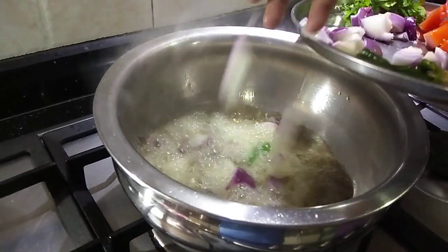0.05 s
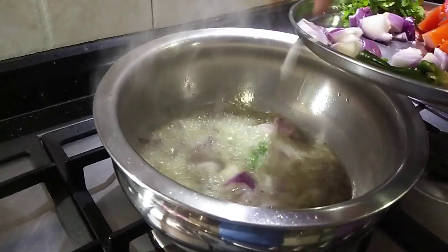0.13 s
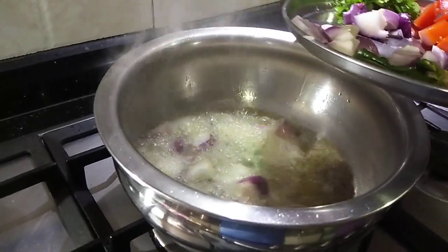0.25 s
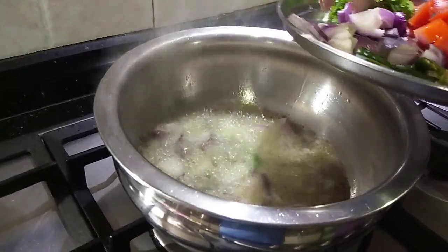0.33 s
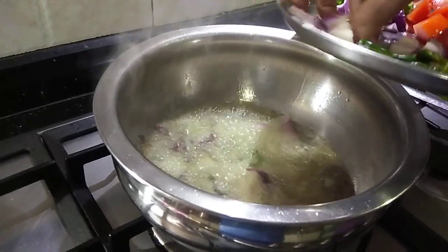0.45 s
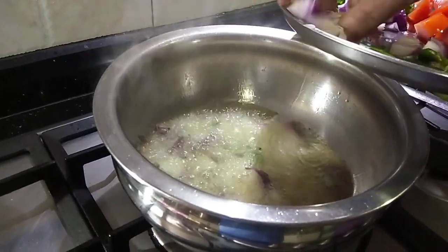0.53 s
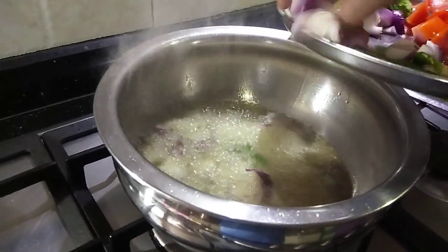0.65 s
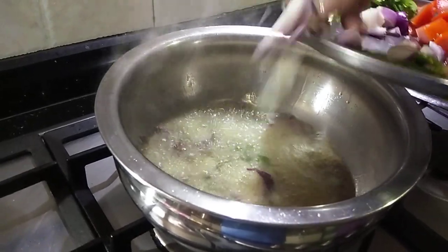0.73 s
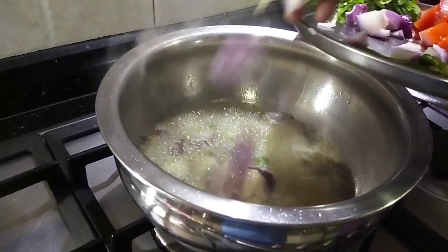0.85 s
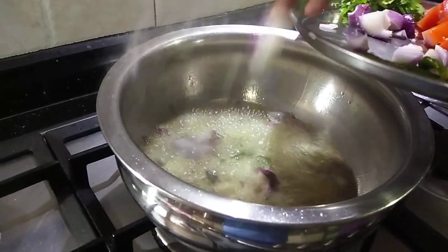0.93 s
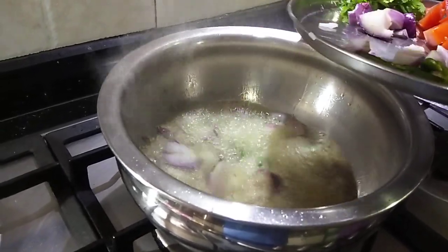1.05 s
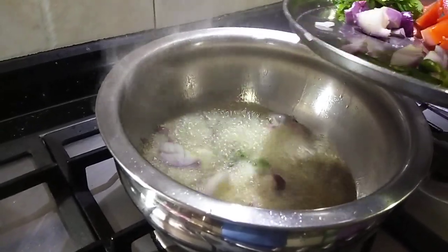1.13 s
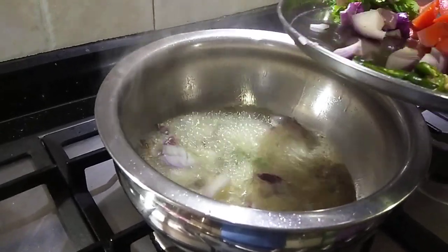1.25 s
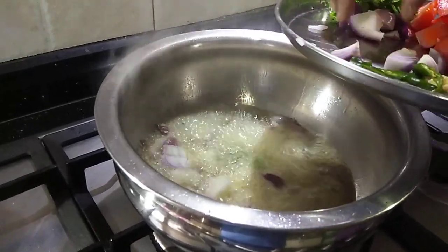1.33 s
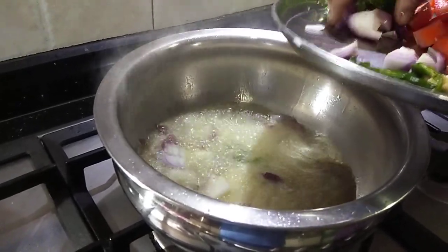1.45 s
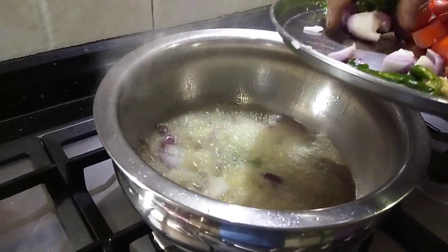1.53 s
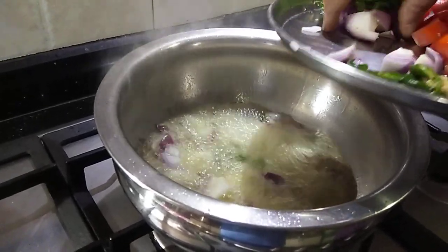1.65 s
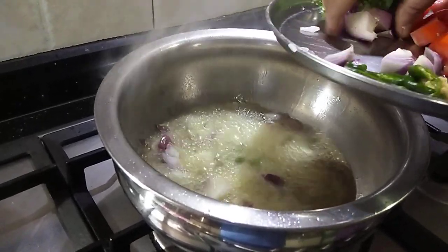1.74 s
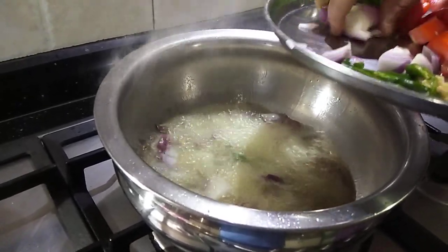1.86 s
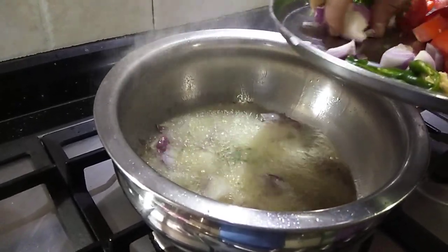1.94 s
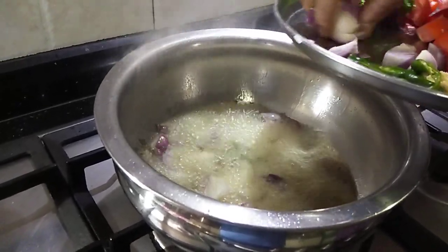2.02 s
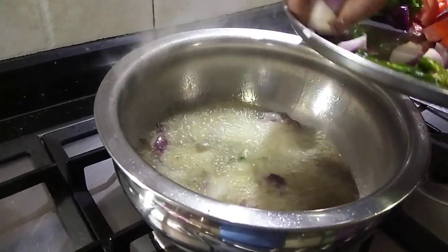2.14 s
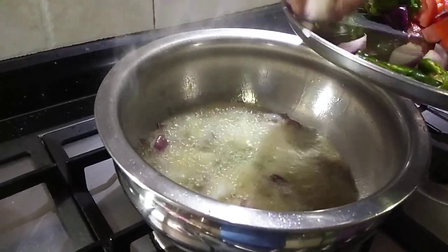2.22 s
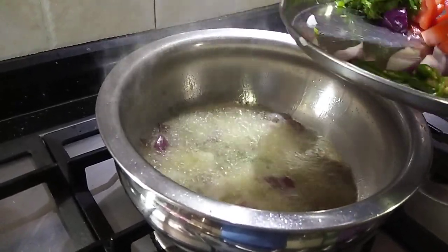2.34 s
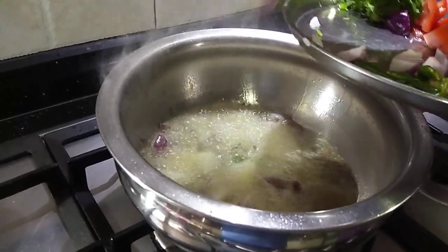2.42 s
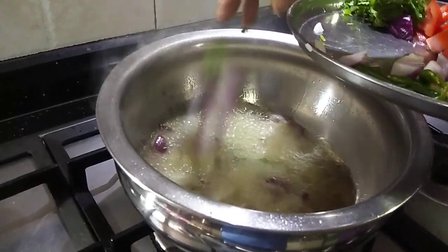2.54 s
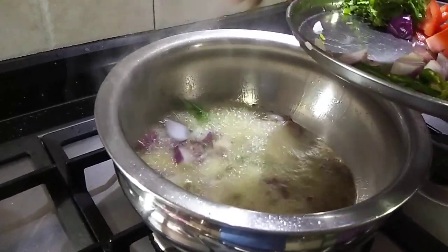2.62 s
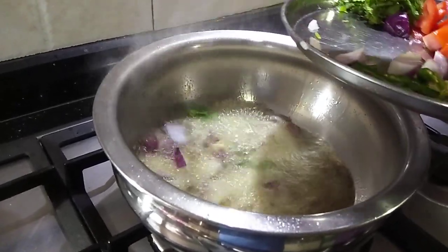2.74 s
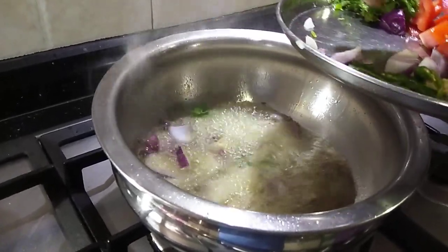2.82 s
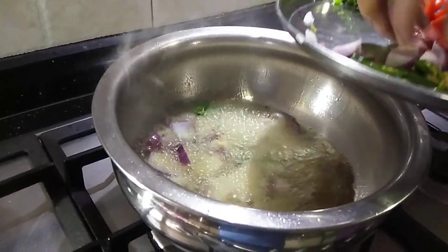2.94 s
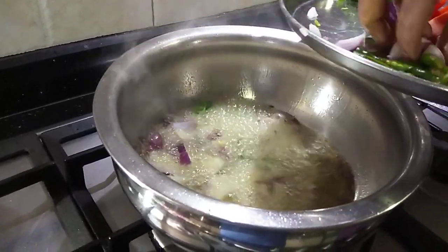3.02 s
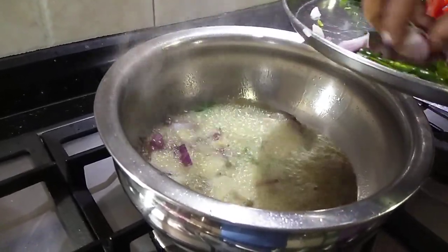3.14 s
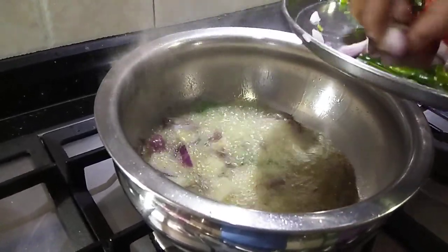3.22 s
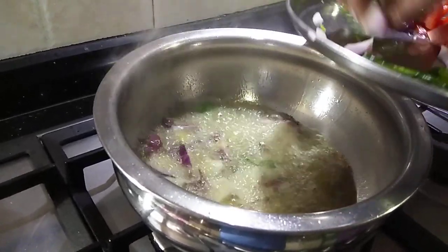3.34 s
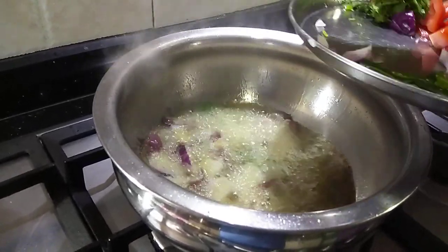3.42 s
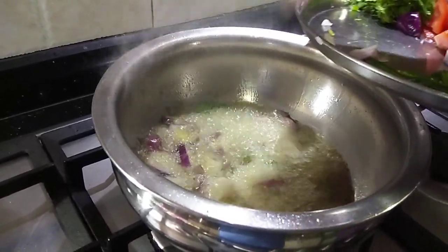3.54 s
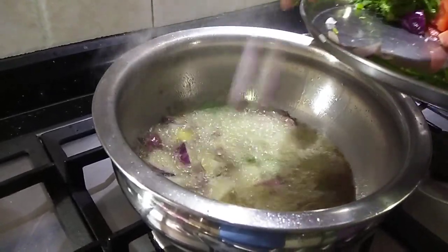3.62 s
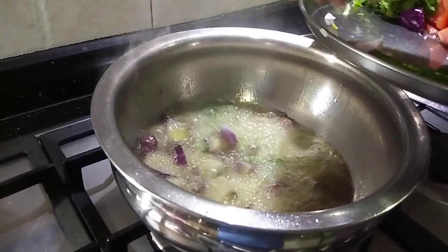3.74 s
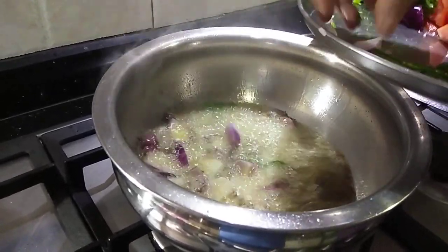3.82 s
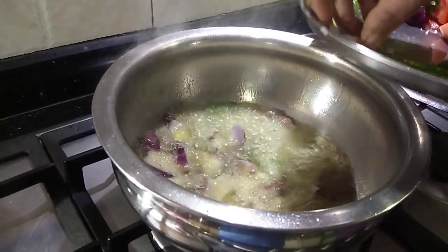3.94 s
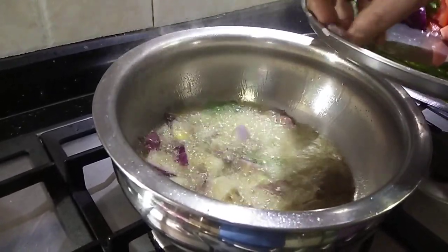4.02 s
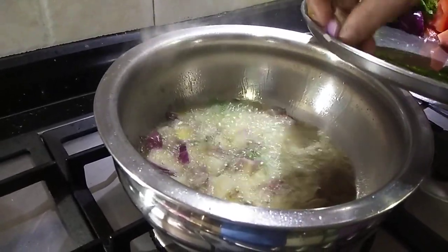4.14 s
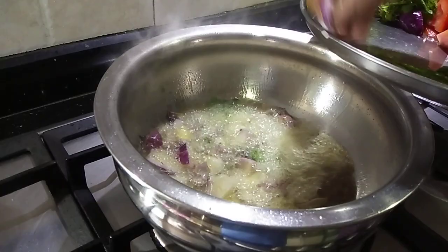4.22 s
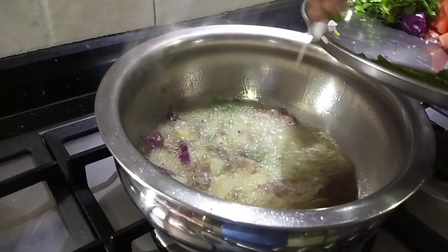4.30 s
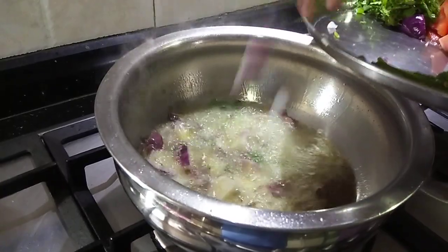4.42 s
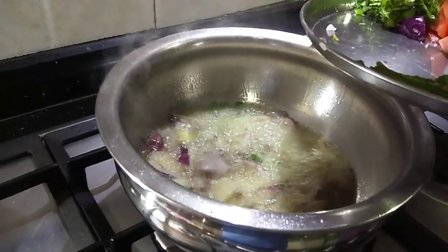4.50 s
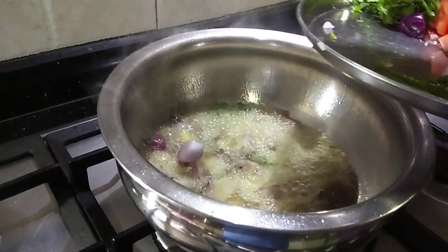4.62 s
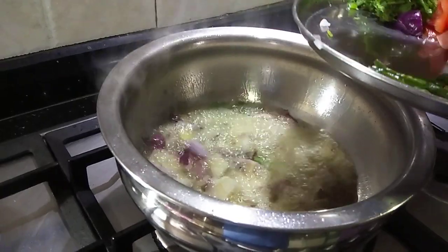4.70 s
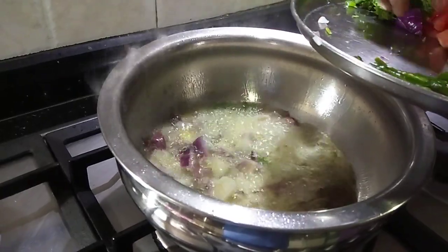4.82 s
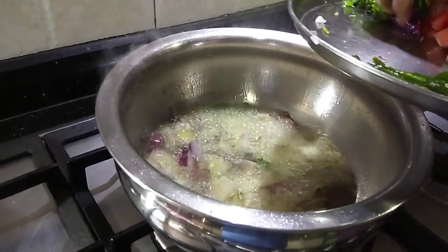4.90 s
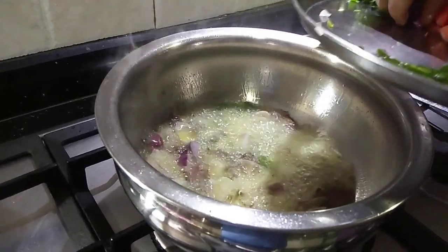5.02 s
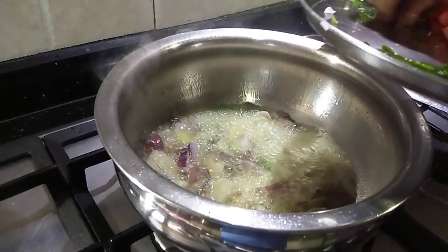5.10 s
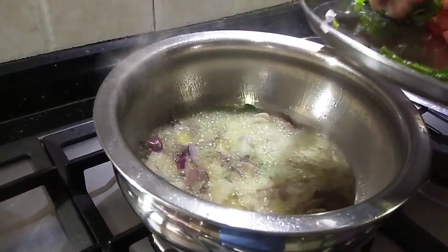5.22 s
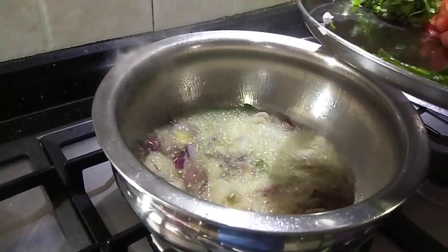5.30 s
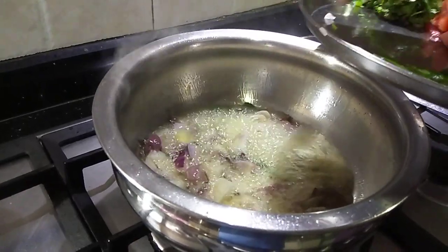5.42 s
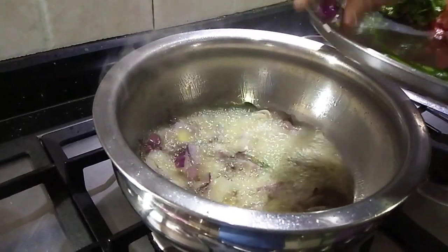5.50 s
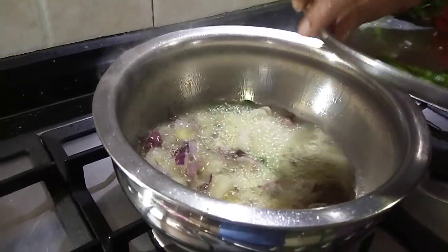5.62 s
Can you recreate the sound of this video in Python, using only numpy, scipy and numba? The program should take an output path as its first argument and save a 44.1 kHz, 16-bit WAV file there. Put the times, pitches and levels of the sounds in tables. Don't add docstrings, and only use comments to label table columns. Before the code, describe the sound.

Close, lively sizzle of wet vegetables in deep hot oil, with snapping crackles, steam spits, a deeper boil and soft pot thuds.

```python
import sys
import numpy as np
from scipy import signal
from scipy.fft import rfft, irfft, next_fast_len
from scipy.io import wavfile
from scipy.ndimage import uniform_filter1d, map_coordinates
from numba import njit

SR = 44100
rng = np.random.default_rng(int(sys.argv[2]) if len(sys.argv) > 2 else 0)


def voltage_ratio(decibels):
    exponent = np.asarray(decibels, float) / 20
    return 10 ** exponent


def log_audio(samples):
    frames = np.atleast_2d(samples).T
    limited = np.clip(frames, -1, 1)
    pcm = np.round(limited * 32767).astype(np.int16)
    wavfile.write(sys.argv[1], SR, pcm)


N = 249606
TIME = np.arange(N) / SR
PADDED = next_fast_len(N + 4096, True)
HZ = np.maximum(np.arange(PADDED // 2 + 1) * SR / PADDED, 1)
FIZZ_PAN_DB = -0.5


def through(x, response):
    return irfft(rfft(x, PADDED) * response, PADDED)[..., :N]


def colour(x, points):
    hz, db = np.transpose(points)
    y = through(x, voltage_ratio(np.interp(np.log(HZ), np.log(hz), db, -90, -90)))
    return y / np.sqrt(np.mean(y ** 2))


def walk(rate):
    hold = int(SR / rate)
    held = np.repeat(rng.standard_normal(N // hold + 1), hold)
    return 1.3 * uniform_filter1d(uniform_filter1d(held, hold), hold)[:N]


def step(s, takes_s):
    return np.clip((TIME - s) / takes_s + .5, 0, 1)


def bumps(s, length_ms, db, rise=1.0):
    coarse = TIME[::64]
    u = (coarse[:, None] - s) / (length_ms / 2350)
    bells = np.exp(-.5 * np.where(u < 0, u / rise, u) ** 2)
    return np.interp(TIME, coarse, (voltage_ratio(2 * db) * bells).sum(axis=1))


@njit
def ring(start, hz, cycles, size, glide):
    out = np.zeros(N)
    for k in range(len(start)):
        first = int(start[k]) + 1
        tau = cycles[k] * SR / hz[k] / 5
        for i in range(max(first, 0), min(N, first + int(8 * tau))):
            u = (i - start[k]) / tau
            swell = u * np.exp(1 - u)
            out[i] += size[k] * swell * np.sin(2 * np.pi * cycles[k] / 5 * u * (1 + glide * u / 8))
    return out


def bubbles(s, hz, cycles, db, pan_db, spread, glide=0.072):
    lag = 3.44 + spread * rng.standard_normal(len(s))
    one = np.ones(len(s))
    ports = []
    for side in (1, -1):
        size = voltage_ratio(db + side * pan_db / 2) * one
        ports.append(ring(s * SR + side * lag / 2, hz * one, cycles * one, size, glide))
    return np.array(ports)


# t/s, lean towards the small ones/dB per octave
SIZE_MIX = [(0, 2), (0.5, 9), (0.7, 4.5), (1.1, 5), (1.5, 6.9), (1.9, 3), (2.15, 7.5), (2.4, 13), (2.5, 1),
            (3, 1.5), (3.6, 2), (4.2, -0.5), (4.7, -3), (5.1, 2.6), (5.66, 6)]


def carpet(points, cycles, scatter_db, spread, patchy_db, lean, count, size):
    moment, pitch, strength, place = np.repeat(rng.random((count, 4)), size, axis=0).T
    z = rng.standard_normal((count * size, 4)).T
    lowest, highest = points[0][0], points[-1][0]
    hz = lowest * (highest / lowest) ** pitch * np.exp(.5 / cycles * z[0])
    s = moment * N / SR - .008 + .011 * np.abs(z[2])
    where = [28 * s + 1, 2.55 * np.log2(hz / 200)]
    patches = map_coordinates(rng.standard_normal((400, 40)), where, order=1, mode="mirror")
    octaves = np.log2(np.clip(hz, 2100, 4500) / 4200)
    lean_db = lean * np.interp(s, *np.transpose(SIZE_MIX)) * octaves
    db = -scatter_db * np.log(strength) + 2.53 * z[1] + 10 * np.log10(hz) + patchy_db * patches + lean_db
    rain = bubbles(s, hz, cycles * np.exp(0.37 * z[3]), db, 4.9 * (place - .5), spread)
    return colour(rain, points)


# t/s, vigour level/dB, wetness of the pieces as steam over fizz/dB
VIGOUR = [(0.0, -23.5, 2), (0.3, -23.5, -3.5), (0.6, -26.5, -4.5), (0.89, -26, -6), (1.19, -24, -6.5),
          (1.49, -29.5, -6.5), (1.79, -29.5, -7), (2.09, -33, -4.5), (2.38, -30.5, -9), (2.68, -28, -1.5),
          (2.98, -31, 4), (3.4, -24, 3.5), (3.87, -30, 4.5), (4.17, -25.5, -2.5), (4.47, -29.5, 3),
          (4.9, -34, 0.5), (5.36, -37.5, 2.5), (5.66, -39.5, 1)]


def control(column):
    table = np.array(VIGOUR)
    return np.interp(TIME, table[:, 0], table[:, column])


# f/Hz, level/dB per Hz
KITCHEN_COLOUR = [(15, -52), (25, -21.5), (105, -0.5), (193, -4), (290, 0.5), (383, -3), (458, -7),
                  (520, -14), (680, 3.5), (1140, -120)]


def kitchen():
    mid, side = (colour(rng.standard_normal(N), KITCHEN_COLOUR) * voltage_ratio(2.8 * walk(18)) for _ in range(2))
    stir_db = 0.31 * (control(column=1) + 29)
    return voltage_ratio(-53.5 + stir_db) * (mid + 0.33 * side * np.array([[1], [-1]]))


# t/s, level/dB
ROCKS = [(0.082, -43), (0.238, -41), (0.547, -42), (0.593, -52), (0.945, -40), (1.032, -45), (1.139, -37.5),
         (1.234, -42), (1.357, -56), (1.498, -45), (1.65, -44), (1.734, -39), (1.869, -43), (2.021, -42.5),
         (2.1, -36.5), (2.19, -40), (2.429, -44), (2.594, -34), (2.736, -40), (2.91, -37), (3.245, -42),
         (3.69, -52), (4.373, -46), (5.084, -51)]


def thuds():
    thud_ms, tremble_db, from_s, until_s = 41.4, -57.5, 1, 3.0
    s, db = np.transpose(ROCKS)
    z = rng.standard_normal((len(s), 2)).T
    hz = 113 * np.exp(0.04 * walk(30))
    hum = np.sin(2 * np.pi * np.cumsum(hz) / SR) * voltage_ratio(2.5 * walk(60))
    starts = step(from_s, .1)
    tremble = starts * (1 - step(until_s, 0.25)) * voltage_ratio(2 * (tremble_db + 3.0 * walk(24.46)))
    low = hum * np.sqrt(tremble + bumps(s, 0.49 * thud_ms, db - 2.5))
    rattle_level = voltage_ratio(tremble_db + 1.0) * starts * (1 - step(until_s + 0.47, 0.34))
    rattle = carpet([(130, 2), (190, 1), (330, -6)], 9.3, 1.6, 3.0, 0, 0, count=260, size=1)
    partial_hz = 230 * np.exp(0.365 * z[0])
    partial_db = db - 6.5 + 2.2 * z[1]
    partial = bubbles(s - thud_ms / 3000, partial_hz, 13.5, partial_db, -0.94, 5.0, glide=-0.17)
    return low + rattle_level * rattle + partial


# t/s, peak level/dB, f/Hz
LANDINGS = [
    (0.12, -36, 300),
    (2.58, -31, 290),
    (2.888, -30, 288),
    (3.279, -38, 300),
    (3.689, -32.5, 316),
    (4.55, -34.5, 310),
    (4.87, -35.5, 328),
]


def splats():
    s, db, hz = np.transpose(LANDINGS)
    return bubbles(s, hz, 5.0, db, 0, 1.5)


# t/s, peak level/dB, width/ms
OIL_DROP = (5.082, -1.3, 0.064)


def oil_drop():
    s, db, width_ms = OIL_DROP
    push = -voltage_ratio(db) * np.exp(-.5 * ((TIME - s) / width_ms * 1000) ** 2)
    left = signal.lfilter(*signal.butter(1, 70, "high", fs=SR), push)
    return left * np.array([[1], [0]])


# f/Hz, width/Hz, level/dB
POT_MODES = [(613, 206, 9.5), (693, 25, -10.5), (768, 173, 7.5), (1247, 184, 4.5), (889, 217, -10),
             (1137, 180, -4.5), (1390, 75, 1), (1974, 157, 8.5), (2690, 130, 5.5), (4200, 50, 2.5),
             (4650, 41, -1.5)]


def pot(x):
    cut_hz, t60_s, tail_db = 484, 0.056, -4
    modes = 1
    for f, width, db in POT_MODES:
        spring = f ** 2 - HZ ** 2
        loss = 1j * HZ * width
        modes = modes * (spring + loss * voltage_ratio(db / 2)) / (spring + loss / voltage_ratio(db / 2))
    cut = signal.freqs(*signal.butter(5, cut_hz, "high", analog=True), HZ)[1]
    noise = rng.standard_normal((2, 4096))
    shared = signal.sosfilt(signal.butter(2, 1600, fs=SR, output="sos"), noise[0] - noise)
    tail = (noise + shared) * np.exp(-np.log(1000) * TIME[:4096] / t60_s)
    tail = voltage_ratio(tail_db) * tail / np.sqrt((tail ** 2).sum(axis=1, keepdims=True))
    return through(x, modes * cut * (1 + rfft(tail, PADDED)))


# f/Hz, level/dB per Hz
FOAM_COLOUR = [(1050, -14), (1250, -4), (1600, -6), (1950, -9.5)]
# f/Hz, level/dB per Hz
BLIP_COLOUR = [(1900, -7.5), (2800, -4), (4200, 8), (6500, -4)]


def froth():
    builds, sinks = step(3.36, 1.7), step(4.74, 0.49)
    foam = builds * (1 - sinks) * voltage_ratio(-33 + 0.65 * walk(30))
    blips = voltage_ratio(control(column=1) - 7)
    return (foam * carpet(FOAM_COLOUR, 7.0, 1.5, 3.0, 1.0, 0, count=2500, size=2)
            + blips * carpet(BLIP_COLOUR, 18.6, 2.7, 4.7, 0.83, 1.5, count=500, size=3))


# t/s, peak level/dB, f/Hz, left
# minus right/dB
TICKS = [(0.1216, -15, 5230, -4), (0.197, -8, 5270, -0.5), (0.2144, -12, 4330, 0.0),
         (0.2846, -6, 3220, 0.5), (0.347, -9, 4620, -4), (0.595, -18, 4020, -1.5),
         (0.6285, -8.5, 2230, 1), (0.6827, -5, 4630, -5), (0.7292, -16, 4910, -1.5),
         (0.7771, -1.5, 4300, -1.5), (0.8579, -24, 4300, 0.5), (0.9597, -16, 3730, -1.5),
         (0.9792, -16, 5400, 0), (1.0124, -9, 4190, -6), (1.035, -5.5, 3420, 4),
         (1.0705, -4, 3800, 0), (1.1755, -5, 4450, -5), (1.2357, -11, 2700, 0),
         (1.297, -12.5, 1970, 3), (1.3356, -12.5, 2130, 1), (1.3957, -8, 3440, 0.5),
         (1.4433, -5, 4900, -10), (1.513, -14.5, 2000, -1.0), (1.5932, -10, 3830, -8),
         (1.623, -6, 4630, -2.5), (1.6581, -13, 3500, -4), (1.705, -6.5, 2490, -4),
         (1.7363, -6.5, 4370, -6), (1.753, -4, 4220, 0), (1.8138, -11, 3400, -1),
         (1.9155, -12, 4250, 6), (1.9854, -18, 2780, -9), (2.09, -7, 5030, -8), (2.112, -16, 4100, 0),
         (2.142, -12.5, 4100, -5), (2.208, -20, 4360, -2.5), (2.242, -19, 4760, -1.5),
         (2.3015, -9, 3890, 3), (2.3387, -13, 4790, -1.5), (2.393, -12, 5100, 0.5),
         (2.4478, -7.5, 3430, 3), (2.5043, -4.5, 4330, -7), (2.5513, -21, 2780, -7),
         (2.6424, -14.5, 2060, -8), (2.7013, -11, 2570, -5), (2.7372, -11.5, 3900, -1),
                  (2.7801, -10, 3350, -3), (2.9228, -13, 4370, -1.0), (3.164, -12, 2570, -4),
                  (3.1914, -16, 2820, -4), (3.222, -14, 2870, 0), (3.3303, -18, 2690, -6),
                  (3.378, -11, 4280, -9), (3.4371, -16.5, 2690, -5), (3.4575, -16, 1980, -4),
                  (3.592, -12.5, 3630, -2.5), (3.7479, -12.5, 3250, -1.5), (3.7804, -14, 4100, -5),
                  (3.7948, -11.5, 2720, -9), (3.905, -18, 2820, -6), (3.964, -13, 2700, -9),
                  (4.048, -7.5, 3560, -3), (4.0831, -22, 1950, -8), (4.1789, -13, 4300, -5),
                  (4.3226, -22, 1970, -1.5), (4.6883, -21.5, 2620, -4), (4.7157, -12.5, 2920, -3.5),
                  (4.8714, -12.5, 3360, -1), (4.9402, -15, 2300, -9), (4.9646, -16, 5600, 1),
                  (5.0145, -19.5, 2060, -2), (5.0967, -15.5, 4200, -16), (5.104, -18, 2690, -11),
                  (5.1803, -30, 2540, -9), (5.1911, -14, 2840, -9), (5.2272, -20, 2500, -10),
                  (5.2565, -13, 4570, -13), (5.302, -17.5, 3380, -14), (5.5348, -12.5, 3580, -7),
                  (5.626, -20, 3500, -4.5)]


def ticks(count=3):
    s, db, hz, pan_db = np.transpose(TICKS)
    first = bubbles(s, hz, 11.4, db - 6.5, 1.5 * pan_db, 1.83)
    s, db, hz, pan_db = np.repeat([s, db, hz, pan_db], count, axis=1)
    u = rng.random((len(s), 2)).T
    late = 0.001208 - 0.0027 * np.log(u[0])
    return first + bubbles(s + late, hz * np.exp(0.25 * (u[1] - .5)), 11.0, db - 7.0, 0.8 * pan_db, 3.1)


# t/s, peak level/dB, f/Hz
MIDDLE_POPS = [(0.376, -18.5, 1370), (0.492, -14, 1520), (1.013, -10.5, 1190), (1.623, -14.5, 1370),
               (1.915, -13, 1120), (2.504, -11.5, 1505), (2.637, -14.5, 1350), (2.734, -9.5, 1420),
               (2.759, -8.5, 1200), (2.829, -16, 1230), (2.888, -6, 1340), (3.108, -3, 1640),
               (3.222, -14, 1200), (3.334, -15.5, 1240), (3.591, -14, 1260), (3.612, -15.5, 1250),
               (3.686, -14.5, 1310), (3.96, -8.5, 1310), (4.135, -13, 1130), (4.282, -15, 1430),
               (4.457, -14, 1460), (4.507, -10, 1500), (4.534, -13, 1370), (4.598, -15.5, 1570),
               (4.718, -19, 1390), (4.872, -9, 1310), (4.94, -18.5, 1460), (5.534, -23, 1280)]
# t/s, peak level/dB, f/Hz
RIGHT_WALL_POPS = [(0.146, -15.5, 1770), (0.214, -10, 2290), (0.468, -12, 1860), (0.629, -14.5, 2260),
                   (0.823, -13, 2500), (1.089, -11.5, 1880), (1.186, -10.5, 1870), (1.3, -21, 1900),
                   (1.321, -12.5, 2230), (1.437, -14.5, 2540), (1.49, -15.5, 2080), (1.707, -22, 2400),
                   (1.783, -16.5, 2500), (1.879, -17, 2500), (2.068, -14.5, 2300), (2.111, -18, 2400),
                   (2.449, -13.5, 2300), (2.951, -12.5, 2190), (2.976, -12, 2060), (4.362, -16, 2250),
                   (4.738, -12, 2130), (4.852, -16, 1970), (5.031, -12.5, 2000), (5.422, -15.5, 1960)]


def all_pops():
    middle = [row + (-1,) for row in MIDDLE_POPS]
    wall = [row + (-13.5,) for row in RIGHT_WALL_POPS]
    return np.array(middle + wall, float).T


def pops(count=5):
    s, db, hz, pan_db = all_pops()
    pan_db = pan_db - 0.5 * rng.standard_normal(len(s))
    burst = bubbles(s, hz, 3.55, db - 0.5, pan_db, 1.3)
    crack = bubbles(s, 2.36 * hz, 4.3, db - 8, pan_db, 2.6)
    s, db, hz, pan_db = np.repeat([s, db, hz, pan_db], count, axis=1)
    u = rng.random((len(s), 3)).T
    late = .001 - .007 * np.log(u[0])
    after_hz = hz * np.exp(0.41 * (u[1] - .45))
    after_db = db - 5.5 - 7.6 * u[2] - 250 * late
    return burst + crack + bubbles(s + late, after_hz, 2.74, after_db, pan_db, 6.0)


# t/s, level/dB, length/ms, f/Hz
FREE_SWARMS = [(0.041, -32, 23, 6140), (0.123, -17, 16, 4600), (0.351, -17, 18, 4900),
               (0.516, -24, 65, 4200), (0.654, -12.5, 36, 5300), (0.78, -12, 14, 4100),
               (0.983, -12, 14, 5500), (1.073, -15.5, 14.4, 3520), (1.11, -12, 16, 5120),
               (1.239, -18, 14.6, 3240), (1.362, -20, 14, 4500), (1.595, -20, 19.6, 3790),
               (1.625, -15.5, 24, 4650), (1.781, -17.5, 19, 3850), (1.824, -19, 14, 3930),
               (1.99, -26.5, 25, 3300), (2.088, -23, 23, 5030), (2.115, -19, 14.4, 3640),
               (2.175, -23.5, 16, 4100), (2.308, -30, 15.5, 3860), (2.35, -22.5, 18, 4500),
               (2.453, -22.5, 40, 3800), (2.702, -21.5, 18.2, 2850), (2.985, -17, 47, 4140),
               (3.795, -19, 30, 2970), (4.967, -22.5, 24, 4800), (5.097, -27, 33, 4400),
               (5.197, -23.5, 31, 3200), (5.258, -31, 24, 4530), (5.306, -30, 58, 3400)]


def all_swarms():
    s, db = all_pops()[:2]
    one = np.ones(len(s))
    freed = [s + .006, -23 + 0.49 * (db + 10), 22 * one, 4100 * one]
    return np.hstack([np.transpose(FREE_SWARMS), freed])


def swarms(count=24):
    s, db, length_ms, hz = np.repeat(all_swarms(), count, axis=1)
    z = rng.standard_normal((len(s), 4)).T
    size_db = db + 10 * np.log10(length_ms / 20) - 5.0 + 2.2 * z[2]
    late = (.45 * np.abs(z[0]) - .3) * length_ms / 1000
    cycles = 5.3 * np.exp(0.73 * z[3])
    return bubbles(s + late, hz * np.exp(0.077 * z[1]), cycles, size_db, FIZZ_PAN_DB, 4.96)


# f/Hz, level/dB per Hz
BOIL_COLOUR = [(450, -16.5), (700, -10), (1000, -1), (1400, 2), (2000, -3.5), (3000, -11.5)]
# f/Hz, level/dB per Hz
FIZZ_COLOUR = [(2000, -3), (2800, -2.5), (4300, 0.5), (5500, -1), (6900, -1.5), (8000, -19), (10000, -14.5)]
# f/Hz, level/dB per Hz
STEAM_COLOUR = [(7000, -11), (8400, -17), (10300, -8.5), (11800, -9), (13200, -2), (15000, 1.5),
                (16000, -14.5)]
# t/s, level/dB, length/ms
JETS = [(0.037, -17.5, 20), (0.369, -24, 90), (0.492, -23.5, 62), (0.655, -20.5, 25), (0.803, -26, 21),
        (0.859, -17.5, 16), (0.995, -26, 79), (1.037, -26.5, 46), (1.105, -26.5, 30), (1.259, -18, 14),
        (1.348, -21, 14), (1.441, -26.5, 27), (1.495, -23.5, 27), (1.623, -28, 57), (1.684, -26, 45),
        (1.852, -24.5, 16), (2.016, -25.5, 24), (2.21, -25, 10), (2.254, -26.5, 25), (2.469, -21, 16),
        (2.66, -22, 36), (3.772, -23.5, 22), (4.354, -31, 83), (4.701, -24, 12), (4.77, -24.5, 19),
        (4.876, -28.5, 28), (5.078, -25, 21), (5.147, -27, 8.3), (5.425, -25, 10), (5.55, -32.5, 30),
        (0.2, -26, 34), (0.27, -24, 33), (0.55, -27, 27), (0.91, -30, 35), (1.775, -35, 20),
              (1.98, -30, 20), (2.6, -36, 18), (2.78, -26, 23), (2.975, -32, 30), (3.02, -24.5, 25),
              (3.12, -24, 54), (3.185, -28, 26), (3.47, -27, 25), (3.58, -27, 28), (3.635, -25, 28),
              (3.72, -33, 19), (3.83, -30.5, 24), (3.865, -31.5, 17), (4.015, -25, 23), (4.181, -31, 30),
              (4.26, -32, 30), (4.31, -29, 22), (4.4, -28, 23), (4.55, -30, 26), (4.94, -33, 22),
              (4.965, -32, 18), (5.035, -27, 25), (5.222, -34, 20), (5.29, -32, 45), (5.38, -30.5, 23),
              (5.468, -42, 22), (5.59, -31, 20)]


def frying():
    fizz_db = control(column=1)
    boil_db = fizz_db - 11 + 5.5 * step(2.47, 0.14)
    steam_db = fizz_db + control(column=2)
    shade_db = -5.5 * step(5.15, .2)
    side = np.array([[.5], [-.5]])
    fizz_pan = voltage_ratio(side * (FIZZ_PAN_DB + shade_db))
    steam_pan = voltage_ratio(side * (6.5 + shade_db))

    s, db = all_pops()[:2]
    boil = voltage_ratio(2 * (boil_db - 0.5 + 1.6 * walk(24.07)))
    boil += bumps(s + 0.00074, 22, db - 18.0, rise=0.11)

    s, db, length_ms = all_swarms()[:3]
    fizz = voltage_ratio(2 * (fizz_db - 0.65 + 0.96 * walk(30)))
    fizz += bumps(s - length_ms / 5000, 0.71 * length_ms, db - 4.0, rise=0.38)

    s, db, length_ms = np.transpose(JETS)
    fizz += bumps(s, 0.66 * length_ms, db - 1.5)
    steam = voltage_ratio(2 * (steam_db - 3.5 + 1.46 * walk(30)))
    steam += bumps(s, 0.57 * length_ms, db - .3)

    low = carpet(BOIL_COLOUR, 5.35, 1.9, 5.9, 1.04, 0, count=4200, size=4)
    middle = carpet(FIZZ_COLOUR, 9.8, 1.12, 8.26, 1.8, 1.02, count=9000, size=3)
    high = carpet(STEAM_COLOUR, 44.0, 0.34, 11.67, 1.9, 0, count=18000, size=2)
    return (np.sqrt(boil) * fizz_pan * low
            + np.sqrt(fizz) * fizz_pan * middle
            + np.sqrt(steam) * steam_pan * high)


def scene():
    oil = frying() + swarms() + ticks() + pops() + froth()
    return pot(voltage_ratio(-1.0) * oil) + thuds() + splats() + oil_drop() + kitchen()


def roll_off(x):
    return signal.sosfilt(signal.butter(12, 16760, fs=SR, output="sos"), x)


def record(dry):
    rounded = np.tanh(0.8 * dry) / 0.8
    mix = through(rounded, HZ < 15500)
    return roll_off(mix)


dry = scene()
out = record(dry)
log_audio(out)
```